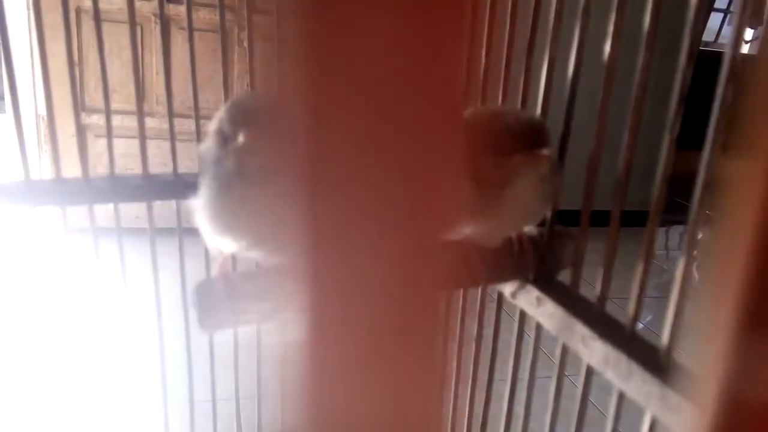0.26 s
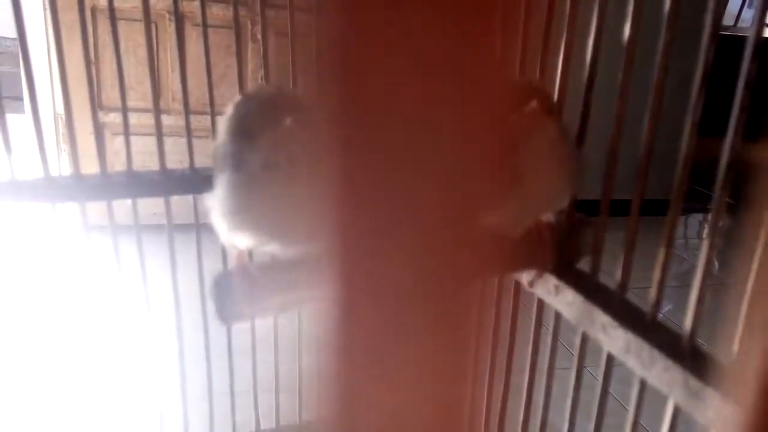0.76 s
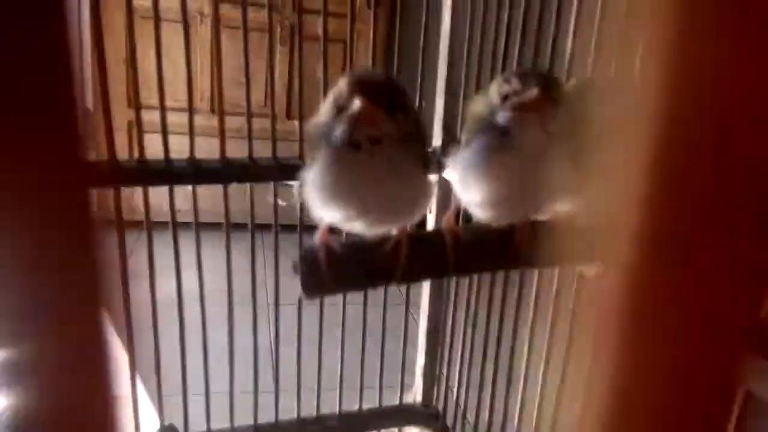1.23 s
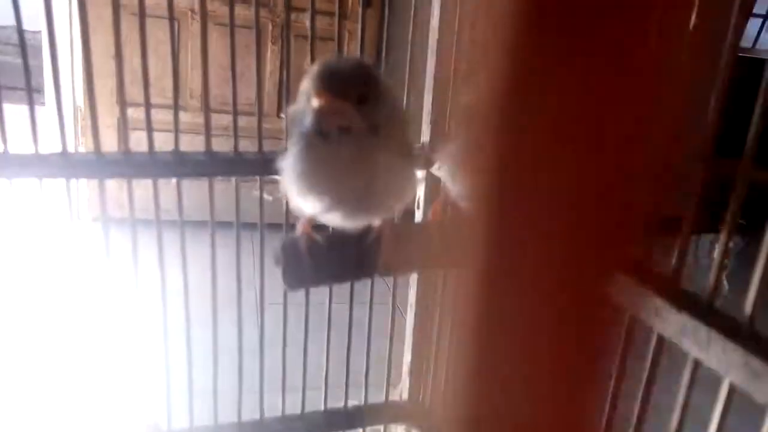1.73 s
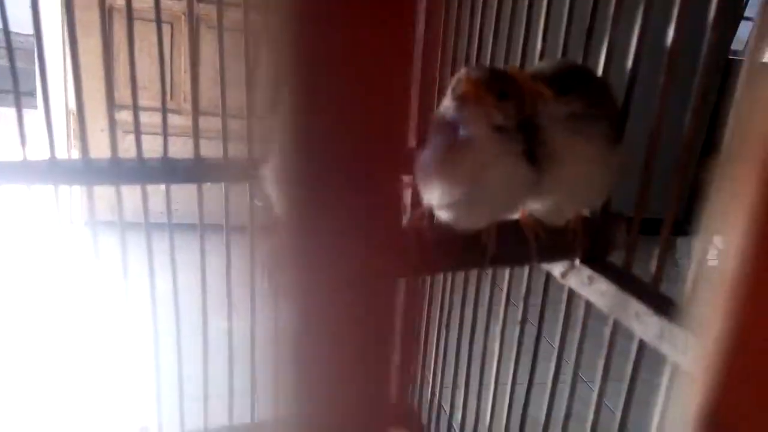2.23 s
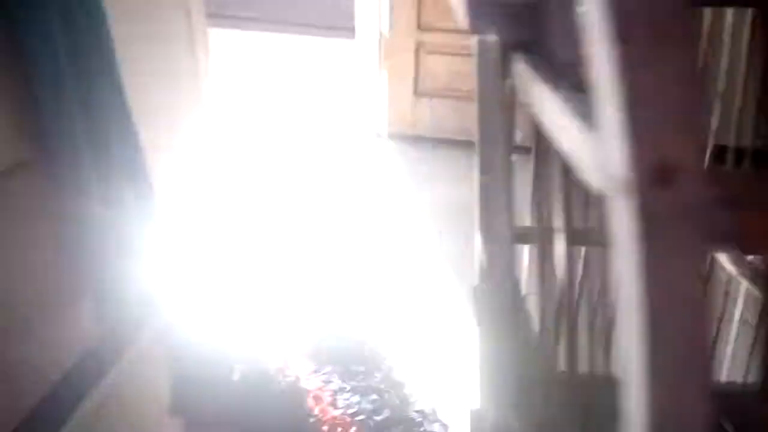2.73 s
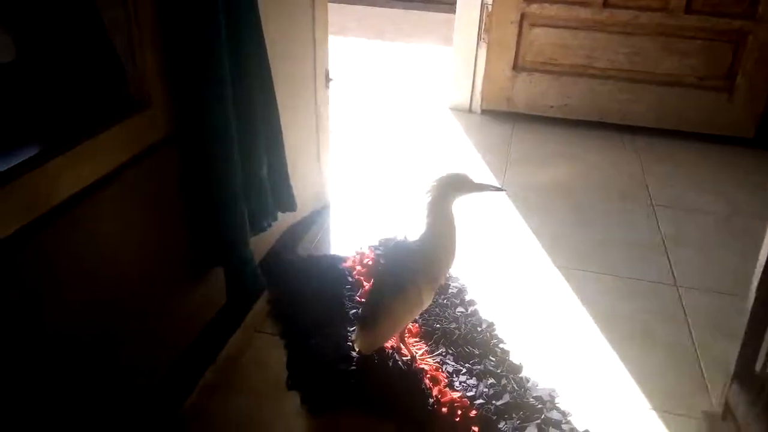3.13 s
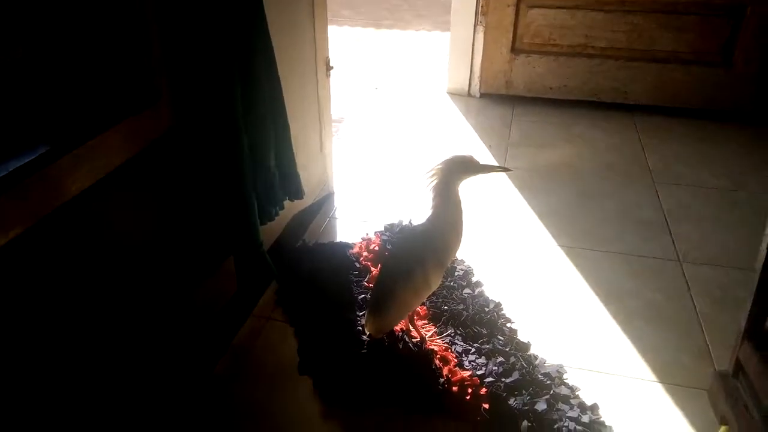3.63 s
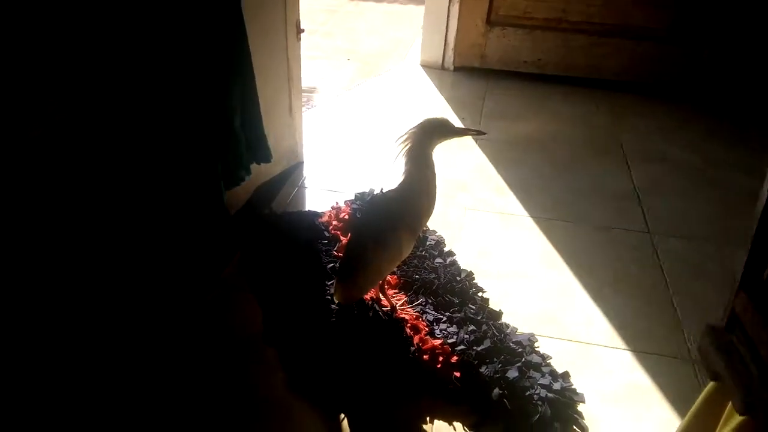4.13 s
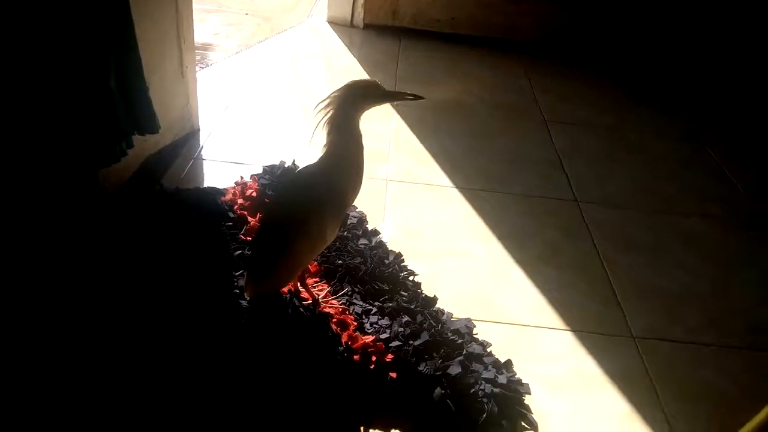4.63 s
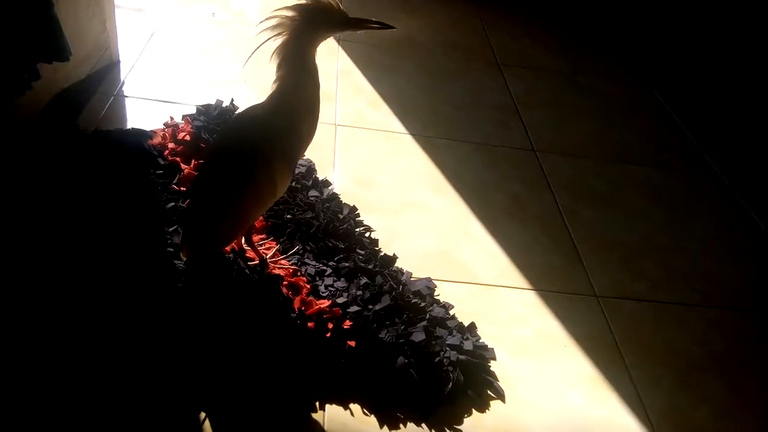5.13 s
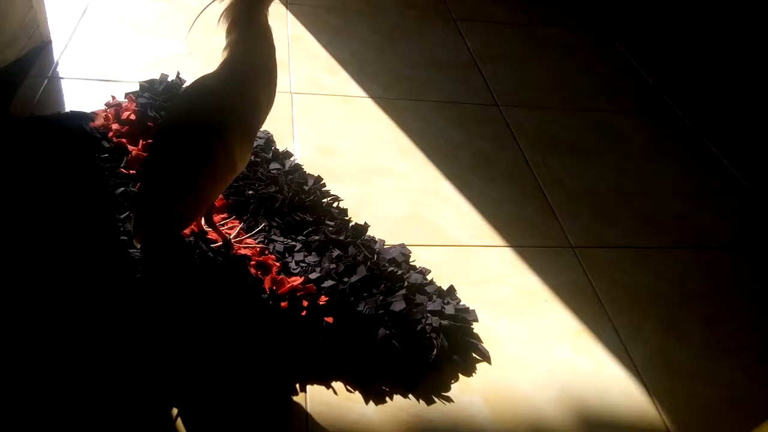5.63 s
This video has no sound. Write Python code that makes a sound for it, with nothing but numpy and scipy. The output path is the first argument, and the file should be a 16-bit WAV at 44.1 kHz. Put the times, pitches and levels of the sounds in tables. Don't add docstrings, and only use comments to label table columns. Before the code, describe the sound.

Piercing downward chirps ring off tiles while doves coo in fluttering low tones, claws tick on wood and a foot scrapes grit.

```python
import sys
import numpy as np
from scipy import signal
from scipy.io import wavfile

SR = 44100
rng = np.random.default_rng(int(sys.argv[2]) if len(sys.argv) > 2 else 0)


def store_wav(level_fs):
    pcm = np.round(np.clip(np.atleast_2d(level_fs), -1, 1) * 32767)
    wavfile.write(sys.argv[1], SR, pcm.T.astype(np.int16))


def attenuation_scalar(level_db):
    decades = np.asarray(level_db, float) / 20
    return 10 ** decades


N = 258426


def rms_one(x):
    return x / np.sqrt(np.mean(x ** 2) + 1e-20)


def at_hz(points, hz):
    table_hz, values = np.transpose(points)
    return np.interp(np.log(hz), np.log(table_hz), values)


def drift(rate, count=N):
    r = np.exp(-2 * np.pi * rate / SR)
    settle = 20000
    wander = signal.lfilter([1], [1, -2 * r, r * r], rng.standard_normal(count + settle))
    return rms_one(wander[settle:])


def add(out, s, x):
    i = round(s * SR)
    out[i:i + len(x)] += x[:N - i]


def fade(count, in_s, out_s):
    t = np.arange(count) / SR
    nearest_end = np.minimum(t / in_s, t[::-1] / out_s)
    return np.sin(np.pi / 2 * np.clip(nearest_end, 0, 1)) ** 2


def turns(hz):
    return 2 * np.pi * np.cumsum(hz) / SR


def ring(clicks, hz, t60):
    r, w = attenuation_scalar(-60 / (t60 * SR)), 2 * np.pi * hz / SR
    return signal.lfilter([0, np.sin(w)], [1, -2 * r * np.cos(w), r * r], clicks + 1e-18)


def band_pass(x, low_hz, high_hz, order=2):
    return signal.sosfilt(signal.butter(order, [low_hz, high_hz], "band", fs=SR, output="sos"), x)


def coloured(source, spectrum, patchy_db):
    out, edges = 0, 22 * 2 ** np.arange(0, 9.6, .5)
    for k, (low, high) in enumerate(zip(edges, edges[1:])):
        band = band_pass(source[k % 2], low, high)
        hz = min(np.sqrt(low * high), 6000)
        out = out + band * attenuation_scalar(at_hz(spectrum, hz) + patchy_db * drift(16.0))
    return out


def near_1k(x):
    return x / np.std(band_pass(x, 950, 1500))


def effort(length, peak, rise_db, fall_db):
    share, peak = np.linspace(0, 1, int(length * SR)), np.clip(peak, .05, .95)
    rising = -rise_db * (1 - share / peak) ** 2
    falling = -fall_db * ((share - peak) / (1 - peak)) ** 2
    return np.where(share < peak, rising, falling)


def air():
    # frequency in Hz, density in dB per Hz.
    spectrum = [(15, -66), (25, -27.5), (54, -20), (153, -8), (389, -11), (503, -12), (696, -19.5),
                (1010, -10.5), (1540, -24.5), (1690, -14), (2080, -18), (2230, -9), (3900, -8.5),
                (6500, -22.5), (8450, -53), (14300, -120)]
    # time in seconds, level near 1.2 kHz in dB.
    levels = [(0.0, -77), (2.4, -79.5), (4.5, -79), (5.86, -76.5)]
    s, level_db = np.transpose(levels)
    tone = near_1k(coloured(rng.standard_normal((2, N)), spectrum, patchy_db=1.2))
    return attenuation_scalar(np.interp(np.arange(N) / SR, s, level_db)) * tone


def rumble():
    # centre of the swell in seconds, level in dB.
    lumps = [(0.54, -68), (0.73, -65.5), (3.06, -68.5), (3.34, -67.5), (3.83, -66.5), (5.08, -68),
             (5.58, -61), (5.74, -71)]
    t, swell_s, floor_db = np.arange(N) / SR, 0.034, -81.5
    level = attenuation_scalar(floor_db)
    for s, lump_db in lumps:
        level = level + attenuation_scalar(lump_db) * np.exp(-np.abs(t - s) / swell_s)
    low = band_pass(rng.standard_normal(N), 55, 170)
    return attenuation_scalar(-2) * level * rms_one(low)


def dove(calls, throb_hz, sharp, rough, rush_db, sag):
    out = np.zeros(N)
    for s, length, peak_hz, peak_db, peak in calls:
        effort_db = effort(length, peak, rise_db=10.5, fall_db=19.5)
        hz = peak_hz * (1 + sag * effort_db)
        throb = np.cos(turns(throb_hz * (1 + 0.13 * drift(4.2, count=len(hz)))))
        swell = np.exp(sharp * throb) * (1 + rough * drift(44, count=len(hz)))
        tone = np.sin(turns(hz * (1 + .027 * drift(40, count=len(hz)))))
        rush = rms_one(ring(rng.standard_normal(len(hz)), 650, 0.0066))
        coo = rms_one(swell * (tone + attenuation_scalar(rush_db) * rush))
        add(out, s, attenuation_scalar(peak_db + effort_db) * fade(len(hz), 0.024, 0.016) * coo)
    return out


def songbird():
    # start in seconds, length in seconds, pitch in Hz, quaver depth in Hz, level in dB.
    whistles = [(0.094, 0.17, 2730, 40, -64), (2.527, 0.15, 2693, 59, -63),
                (3.102, 0.28, 2770, 90.3, -66.5), (0.477, 0.14, 6410, 300, -62),
                (1.365, 0.023, 1710, 40.2, -61), (1.436, .021, 1693, 41.1, -63.5),
                (1.585, 0.022, 1710, 40.2, -61), (2.53, .13, 4480, 110, -65),
                (3.599, 0.27, 2146, 101.5, -68)]
    # start in seconds, slur level in dB, trill level in dB, trill depth in Hz.
    phrases = [(0.247, -55.5, -61, 478), (2.634, -55, -63, 232), (3.277, -56.5, -65.5, 328)]
    # start s, length s, from Hz, to Hz, bend of the glide, trill depth Hz, level dB.
    notes = []
    for s, length, hz, quaver_hz, level_db in whistles:
        notes.append((s, length, hz, 0.96 * hz, 1, quaver_hz, level_db))
    for s, slur_db, trill_db, depth_hz in phrases:
        notes.append((s, .065, 3050, 4450, 2, 60, slur_db))
        notes.append((s + .05, .3, 4150, 3900, 1, depth_hz, trill_db))
    for s, length, from_hz, to_hz, bend, trill_hz, level_db in notes:
        t = np.arange(int(length * SR)) / SR
        trill = np.sin(2 * np.pi * 34 * t) + .5 * drift(120, count=len(t))
        hz = from_hz + (to_hz - from_hz) * (t / length) ** bend + trill_hz * trill
        None
    out = np.zeros(N)
    for s, length, from_hz, to_hz, bend, trill_hz, level_db in notes:
        t = np.arange(int(length * SR)) / SR
        trill = np.sin(2 * np.pi * 34 * t) + .5 * drift(120, count=len(t))
        hz = from_hz + (to_hz - from_hz) * (t / length) ** bend + trill_hz * trill
        add(out, s, attenuation_scalar(level_db) * fade(len(t), 0.005, 0.012) * np.sin(turns(hz)))
    return out


def ticks():
    # time in seconds, peak in dB, main ring in Hz, dB of the part above the low modes.
    hits = [(0.111, -23, 3890, -2.5), (0.171, -29, 1400, 4.5), (0.532, -40.5, 945, -25.5),
            (1.074, -47.5, 2983, 3), (1.105, -47.5, 2850, 12), (1.339, -43.5, 3740, 1),
            (2.664, -42.5, 2690, 2), (2.728, -64, 4350, -11.5), (4.135, -58.5, 2060, -5),
            (4.164, -57, 2130, -6), (4.822, -62, 2210, -14), (4.891, -37.5, 1660, 7),
            (5.479, -41.5, 5450, -21)]
    # mode in Hz, level in dB, t60 in seconds.
    perch = [(840, -8.5, 0.052), (1400, -28, .016), (1793, 6, 0.015), (2880, 2.5, 0.0047), (4050, 0, .007),
             (5010, -10, 0.013)]
    s, level_db, main_hz, bright_db = np.transpose(hits)
    at = np.round(s * SR).astype(int)
    luck = rng.normal(0, 2.1, (len(s), len(perch)))
    out = np.zeros(N)
    for k, (hz, mode_db, t60) in enumerate(perch):
        clicks = np.zeros(N)
        clicks[at] = attenuation_scalar(level_db - 13.5 + mode_db + luck[:, k] + bright_db * (hz > 2500))
        out += ring(clicks, hz, t60)
    for i, peak_db, hz in zip(at, level_db, main_hz):
        add(out, i / SR, ring(np.eye(1, 2000)[0] * attenuation_scalar(peak_db - 5.5), hz, 0.009))
        dry_crack = rng.standard_normal(300) * attenuation_scalar(-np.arange(300) / 7.0)
        add(out, i / SR, attenuation_scalar(peak_db - 15.5) * dry_crack)
    return band_pass(out, 500, 6000)


def scuffs():
    # start in seconds, length in seconds, level in dB, share at which the stroke is hardest,
    # grit above 3 kHz in dB re the dull part.
    strokes = [
        (0.486, 0.11, -70, 0.3, -10),
        (0.866, 0.11, -67, 0.49, -11),
        (0.943, 0.066, -60.5, 0.61, -22),
        (2.689, .13, -70.5, 0.25, -26.5),
        (4.569, 0.28, -67.5, 0.45, -7),
        (4.861, 0.15, -66, 0.21, -5),
        (5.16, 0.27, -75, 0.31, -12),
        (5.444, 0.13, -68.5, 0.65, -2),
        (5.527, .13, -58, .45, 0.3),
        (5.614, .13, -57, 0.45, -2.7),
    ]
    # frequency in Hz, density in dB per Hz.
    spectrum = [(35, -53.5), (60, -14), (237, -9.5), (461, -2), (518, -4.5), (798, -4.5), (1300, -6.5),
                (1680, -4.5), (1850, -6), (6500, -6.5), (8450, -32.5), (14300, -120)]
    hit = rng.random((2, N)) < 8000 / SR
    size = attenuation_scalar(0.86 * np.minimum(rng.exponential(1, (2, N)), 4))
    grit = hit * size * rng.choice([-1, 1], (2, N))
    sound = near_1k(coloured(grit, spectrum, patchy_db=2.0))
    dull = signal.sosfilt(signal.butter(1, 3000, fs=SR, output="sos"), sound)
    stroke, bright = np.zeros((2, N))
    for s, length, peak_db, peak, grit_db in strokes:
        press = attenuation_scalar(peak_db + effort(length, peak, rise_db=16.5, fall_db=12))
        press = press * fade(len(press), 0.037, 0.016)
        add(stroke, s, press)
        add(bright, s, attenuation_scalar(grit_db) * press)
    return stroke * dull + bright * (sound - dull)


def thumps():
    # time in seconds, peak in dB, pitch in Hz.
    pushes = [
        (0.529, -61.5, 75.4),
        (0.739, -73, 70),
        (5.099, -70, 116),
        (5.578, -63, 99.6),
        (5.748, -64.5, 69),
    ]
    out = np.zeros(N)
    for s, level_db, hz in pushes:
        t = np.arange(int(.06 * SR)) / SR
        add(out, s - .01, attenuation_scalar(level_db) * np.sin(2 * np.pi * hz * t) * fade(len(t), 0.011, 0.037))
    return out


def fledgling():
    # start in seconds, level in dB, growth over the chirp in dB, attack in seconds,
    # fundamental at the start in dB re the loudest partial.
    chirps = [
        (0.61, -26.5, -3.5, 0.023, -4),
        (1.132, -33.5, 3.5, 0.0066, -8.0),
        (2.073, -31.5, 2.5, 0.0094, 12),
        (2.236, -28, -3.5, 0.017, -26),
        (3.712, -38.5, 3.5, 0.0053, -8.5),
        (4.433, -27.5, -12, .015, -29),
        (5.108, -33.5, -2.5, 0.006, 8.5),
    ]
    # length in seconds, aimed from Hz, to Hz, hold at the top,
    # settling at the end (exponents).
    glides = [(.116, 7080, 3230, 2.15, 2.75), (.092, 6900, 3600, 1.95, 2.45), (.129, 7120, 2980, 1.2, 1.4),
              (.112, 6960, 3250, 2.45, 4.9), (.118, 7450, 3610, .95, 1.35), (.123, 7230, 3290, 1.62, 2.35),
              (.125, 7370, 2960, .97, 1.17)]
    # multiple of the loudest partial (half steps belong to the fundamental), level in dB.
    overtones = [(1.5, -5), (2, -29), (2.5, -7), (3, -21), (3.5, -7), (4, -21)]
    # start in seconds, length in seconds,
    # from Hz, scatter in Hz, level in dB.
    grace = [(0.609, .012, 5525, 900, -43), (0.72, 0.007, 2580, 200, -61), (1.128, 0.012, 6300, 930, -53),
             (1.211, .026, 5020, 700, -37.5), (1.227, 0.03, 5020, 650, -36), (1.22, .032, 2695, 350, -52.5),
             (2.062, 0.018, 5830, 253, -34.5), (2.2, .02, 2886, 250, -45), (2.342, 0.014, 2630, 203, -56),
             (3.701, .012, 7140, 497, -46.5), (3.826, 0.0196, 3590, 510, -48.5),
             (4.427, 0.0094, 5640, 900, -43), (5.224, .022, 3500, 300, -42),
             (5.093, .022, 5900, 150, -25.5)]
    onset_hz, onset_s = 6650, .008
    settled_db, settle_s = -32.5, 0.03
    out = np.zeros(N)
    for (s, mean_db, grow_db, attack_s, start_db), (length, from_hz, to_hz, hold, settle) in zip(chirps, glides):
        share = np.linspace(0, 1, int(length * SR))
        hz = from_hz * (to_hz / from_hz) ** (1 - (1 - share ** hold) ** settle)
        hz = hz * (1 - (1 - onset_hz / from_hz) * np.exp(-share * length / onset_s))
        level_db = mean_db + grow_db * (share - .5) - 7.5 * (2 * share - 1) ** 2
        low_db = settled_db + (start_db - settled_db) * np.exp(-share * length / settle_s)
        low_db = low_db + 40 * np.minimum(np.log2(hz / 2 / 1900), 0)
        phase = turns(hz * (1 + .002 * drift(150, count=len(hz))))
        waver = attenuation_scalar(4 * drift(40, count=len(hz)))
        voice = np.sin(phase) + attenuation_scalar(low_db) * waver * np.sin(phase / 2)
        for multiple, over_db in overtones:
            odd_db = low_db * (multiple % 1 > 0)
            steepness = 3 if multiple < 2 else 9
            beak = np.minimum(multiple * hz / 12000, 1) ** steepness * (1 - .7 * share)
            audible = multiple * hz < .45 * SR
            voice = voice + attenuation_scalar(over_db + odd_db) * waver * np.sin(multiple * phase) * beak * audible
        add(out, s, 1.904 * attenuation_scalar(level_db) * fade(len(hz), attack_s, 0.0073) * voice)
    for s, length, from_hz, scatter_hz, level_db in grace:
        share = np.linspace(0, 1, int(length * SR))
        hz = from_hz * (.7 + .3 * (1 - share) ** 2.2)
        hz = hz + scatter_hz * np.tanh(drift(400, count=len(hz)))
        rough = 1 + .3 * drift(300, count=len(hz))
        add(out, s, attenuation_scalar(level_db) * rough * fade(len(hz), .6 * length, .004) * np.sin(turns(hz)))
    return out


def creak():
    # start in seconds, end in seconds, clicks per second, level in dB.
    slips = [
        (4.975, 4.995, 140, -45),
        (5.015, 5.1, 130, -44),
        (1.08, 1.11, 45, -54),
    ]
    tones = [(5000, -10), (10600, 3), (13500, 0)]   # (Hz, dB)
    out = np.zeros(N)
    for start, end, per_s, level_db in slips:
        for s in np.arange(start, end, 1 / per_s):
            luck = rng.normal(0, 1, 7)
            click = np.eye(1, 300)[0] * attenuation_scalar(level_db + 2.5 * luck[0])
            for k, (hz, tone_db) in enumerate(tones):
                snap = ring(click, hz * (1 + .06 * luck[k + 4]), .003)
                add(out, s, attenuation_scalar(tone_db + 3 * luck[k + 1]) * snap)
    return out


def early(x):
    # delay in seconds, gain.
    echoes = [(.0013, .25), (.0031, -.35), (.0047, .45), (.0069, -.3), (.0098, .2), (.0137, -.15)]
    out = x.copy()
    for delay_s, gain in echoes:
        add(out, delay_s, gain * x)
    return out / np.sqrt(1 + np.sum(np.array(echoes)[:, 1] ** 2))


def room(x, gap_s):
    # frequency in Hz, t60 in seconds.
    decay = [(400, 0.6), (1500, 0.28), (3200, 0.32), (4800, 0.36), (6800, 0.4)]
    t, tail = np.arange(SR) / SR, 0
    for hz in 250 * 2 ** np.arange(0, 6.):
        band = band_pass(rng.standard_normal(SR), hz / 2 ** .5, hz * 2 ** .5)
        tail = tail + band * attenuation_scalar(-60 * t / at_hz(decay, hz))
    tail = tail * np.clip(t / gap_s, 0, 1)
    return signal.fftconvolve(x, tail / np.sqrt(np.sum(tail ** 2) / 1.1))[:N]


def scene():
    # start in seconds, length in seconds,
    # pitch at full effort in Hz, level in dB, share of the coo at which effort peaks.
    near_coos = [
        (.15, 0.45, 492.3, -52, 0.56),
        (.93, .54, 472.6, -51, 0.8),
        (1.45, 0.13, 471, -63.5, 0.33),
        (2.27, 0.12, 486, -65.5, 0.67),
        (3.12, 0.21, 467.3, -51.5, 0.67),
        (3.27, 0.32, 485.5, -52, 0.18),
        (3.86, 0.6, 469.6, -48.5, 0.57),
        (5.1, .3, 466.6, -64.5, 0.25),
    ]
    high_coos = [
        (.09, 0.19, 657, -53, .15),
        (.32, 0.35, 654, -54, 0.26),
        (.61, 0.28, 746, -50.5, .55),
        (.82, .3, 673, -52.5, 0.25),
        (1.53, 0.076, 697, -65, .5),
    ]
    mid_coos = [
        (.13, .42, 565.6, -54, 0.23),
        (3.14, 0.397, 548.5, -59.5, 0.61),
    ]
    doves = dove(near_coos, 31, sharp=.65, rough=.3, rush_db=-23, sag=.0005)
    doves += dove(high_coos, 47.9, sharp=0.78, rough=0.21, rush_db=-19, sag=.009)
    doves += dove(mid_coos, 40, sharp=0.5, rough=0.1, rush_db=-18.5, sag=0.00092)
    far, taps, strokes, bird = songbird(), ticks(), scuffs(), fledgling()
    sent = attenuation_scalar(-10.5) * bird + attenuation_scalar(-18.5) * taps + attenuation_scalar(-12.5) * strokes + attenuation_scalar(-12.0) * doves + far
    wet = room(sent, 0.0061)
    near = early(bird) + taps + creak() + strokes + thumps()
    return (near + 0.88 * doves + .08 * far + wet + air() + rumble())[None]


def low_pass(x):
    return signal.sosfilt(signal.butter(12, 15500, fs=SR, output="sos"), x)


def record(dry):
    port_hz = [11600, 15200]
    cut_hz = 7100
    dry = signal.sosfilt(signal.butter(1, 35, "high", fs=SR, output="sos"), dry)
    body = signal.sosfilt(signal.cheby2(10, 55, cut_hz * 1.185, fs=SR, output="sos"), dry)
    shelf = signal.sosfilt(signal.butter(4, cut_hz * 1.05, "high", fs=SR, output="sos"), dry)
    port = band_pass(dry, *port_hz, order=3)
    hiss = attenuation_scalar(-86) * rng.standard_normal(dry.shape)
    return low_pass(body + attenuation_scalar(-31) * shelf + attenuation_scalar(-23) * port + hiss)


dry = scene()
out = record(dry)
store_wav(out)
```